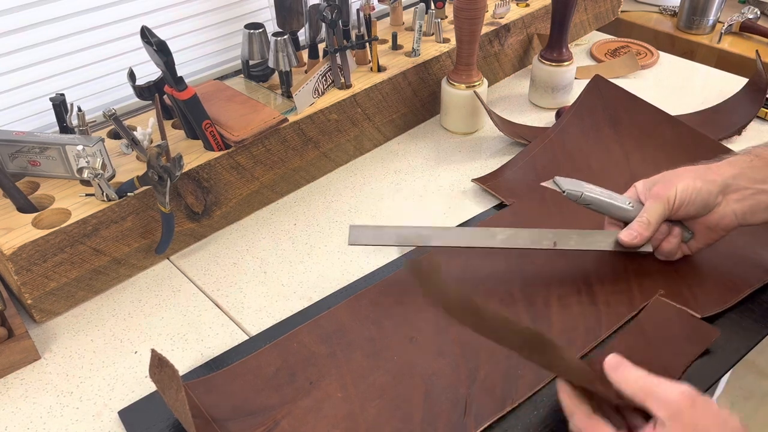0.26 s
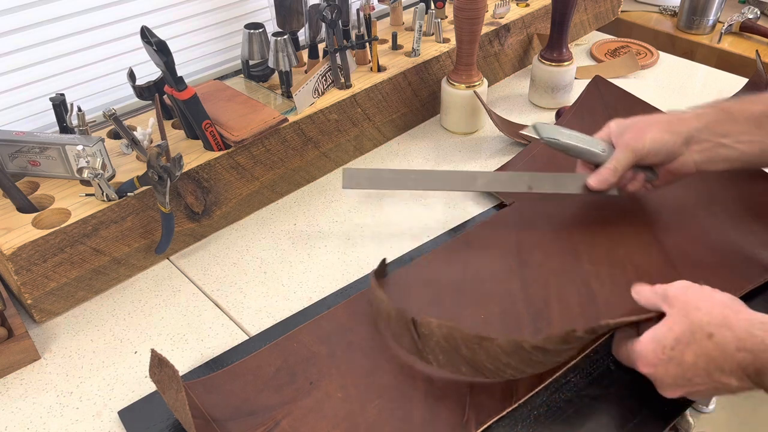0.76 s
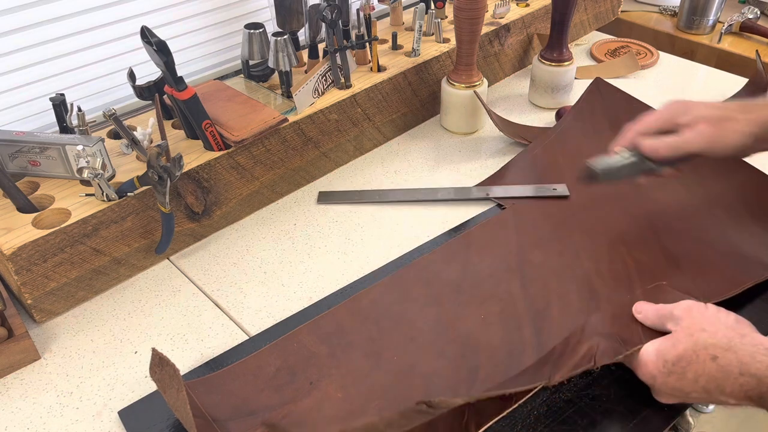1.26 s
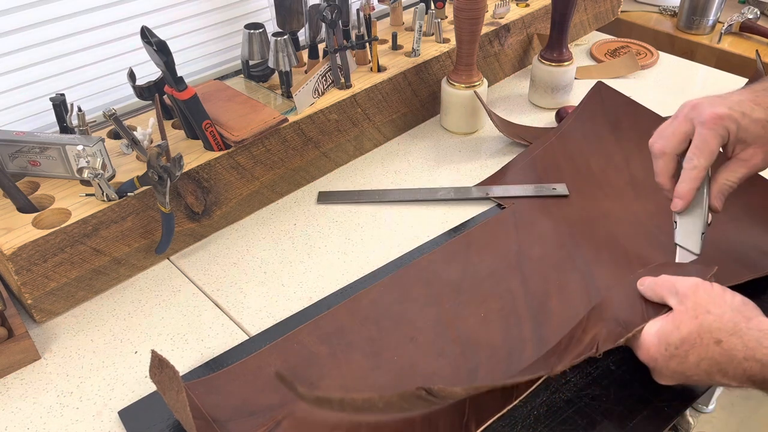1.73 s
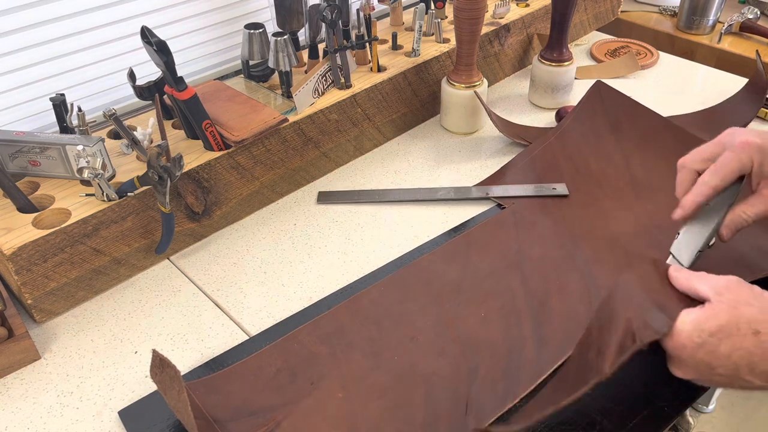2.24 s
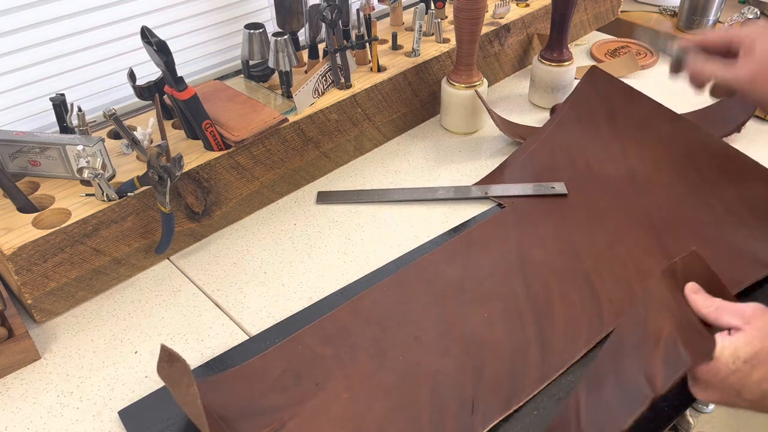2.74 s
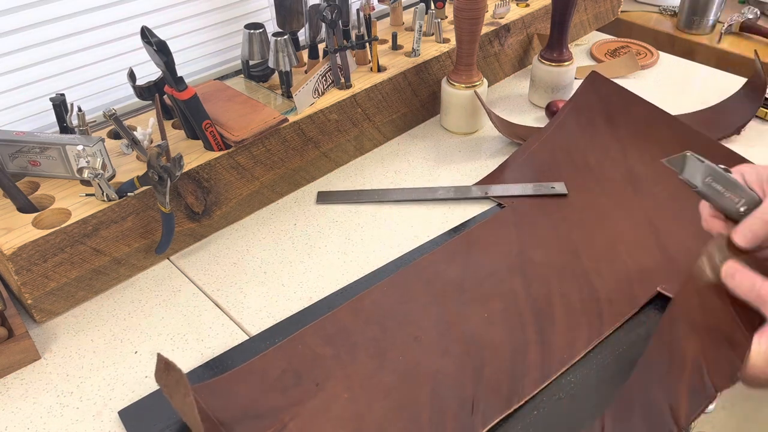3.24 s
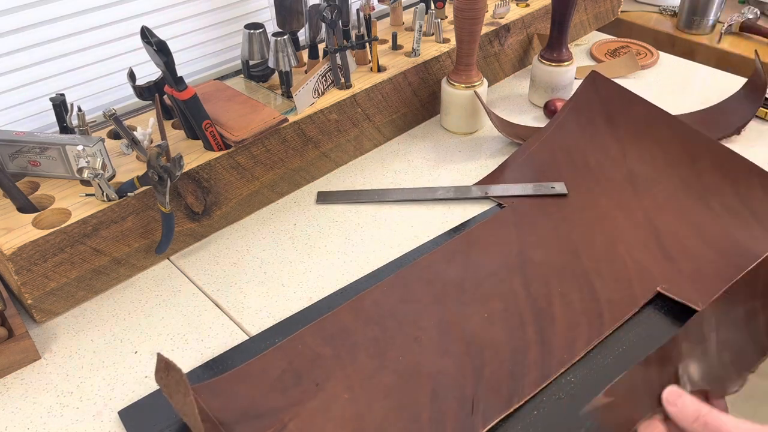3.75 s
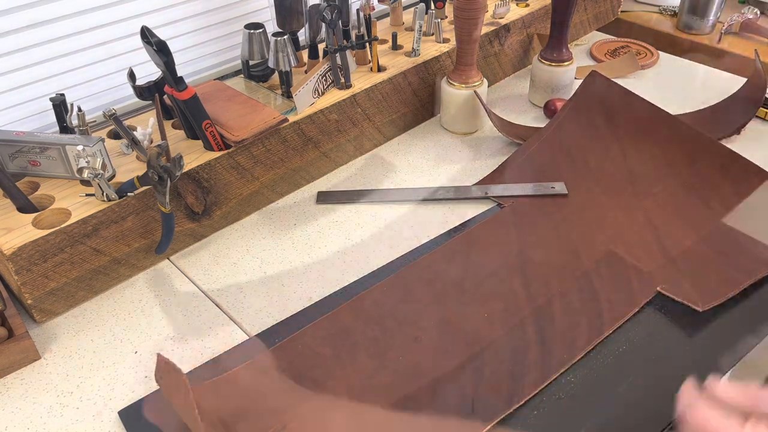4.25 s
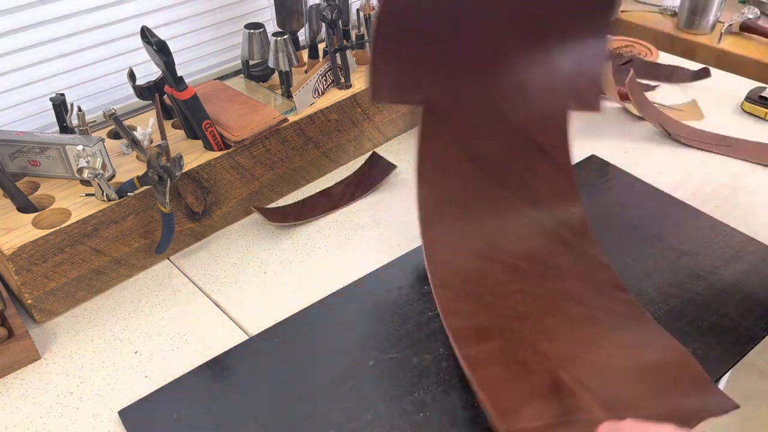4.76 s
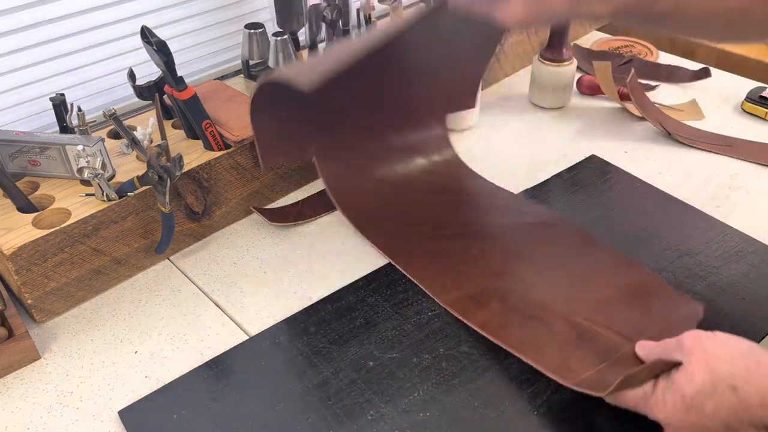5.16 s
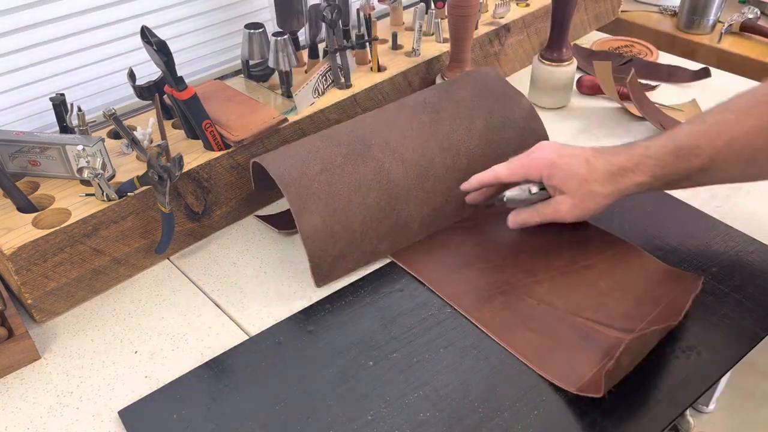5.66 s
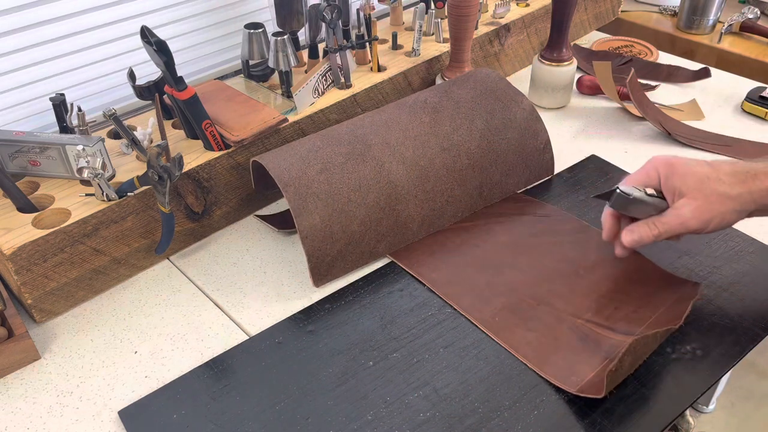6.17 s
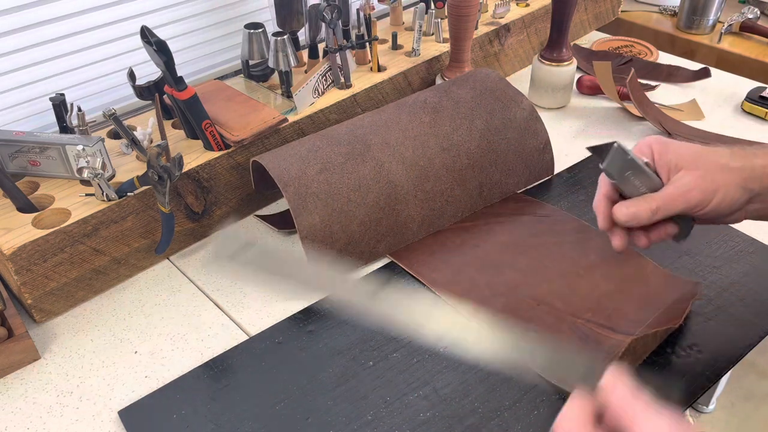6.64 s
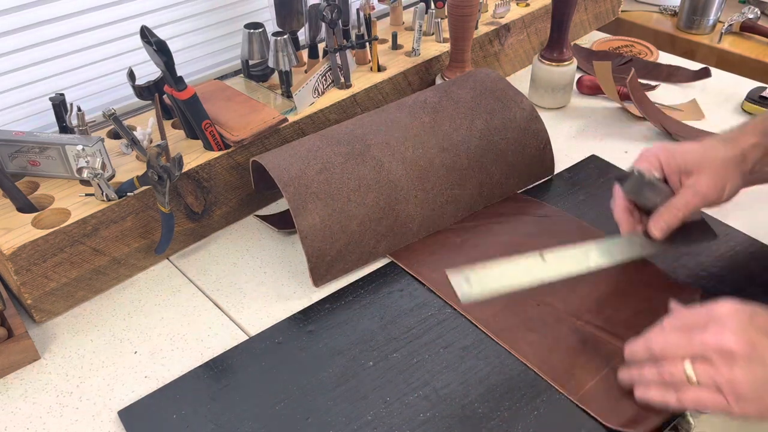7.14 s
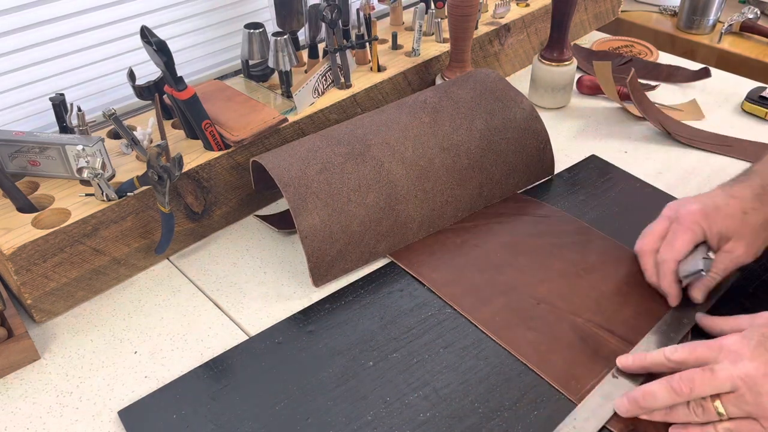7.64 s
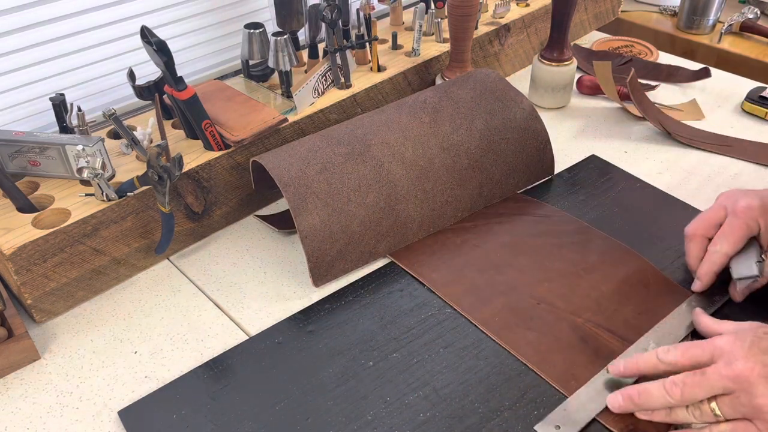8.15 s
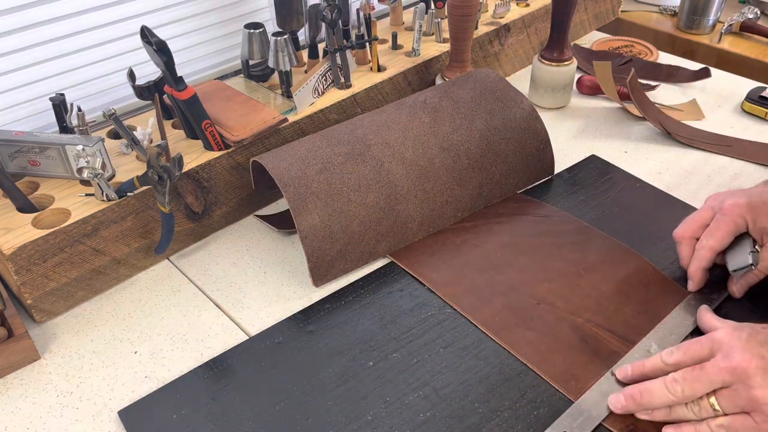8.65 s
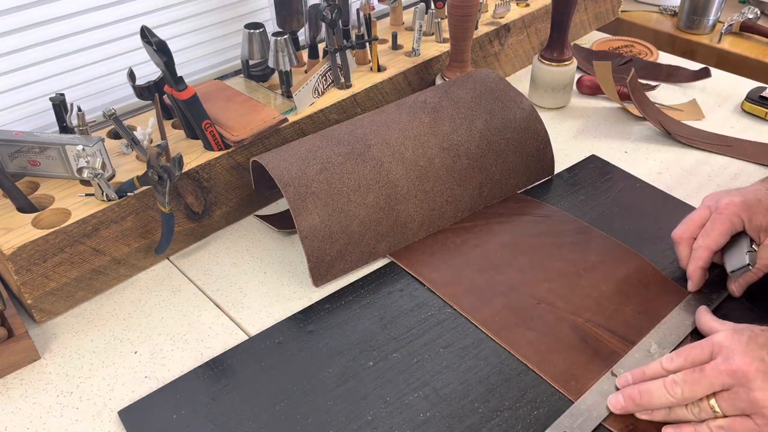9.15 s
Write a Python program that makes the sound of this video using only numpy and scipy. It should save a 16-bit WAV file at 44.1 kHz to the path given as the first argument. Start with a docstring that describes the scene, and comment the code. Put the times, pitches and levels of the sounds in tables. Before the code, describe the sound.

A stiff hide is worked on a wooden bench, heard very close in a small room with faint low room tone. Dull knocks and steel clinks come first, then thin metallic knife rattles and grainy leather friction. The hide is shifted with hollow scuffs and dropped with a sharp, booming slap. Later come smaller rubs, a brisk scrape, a soft thud, and near quiet.

```python
"""Quiet workshop, wooden bench: a stiff hide is handled close to two microphone ports in one small body.
Leather drags and slides as filtered, grainy noise; its slaps are falling air pops with cracks and bench modes.
A steel straightedge is put down and a loose blade rattles in a utility knife's metal handle, as ringing modes.
Low booms lie under the heavier slaps; a dense noise tail lets the room answer each blow over a room tone."""
import sys
import numpy as np
from scipy import signal
from scipy.fft import rfft, irfft, next_fast_len
from scipy.io import wavfile

SR = 44100
rng = np.random.default_rng(int(sys.argv[2]) if len(sys.argv) > 2 else 0)


def amplitude_ratio(level_db):
    """Convert a level in decibels to the matching linear amplitude (field) ratio."""
    exponent = np.asarray(level_db, float) / 20
    return 10 ** exponent


def persist_wave(psi):
    """Save psi, clipped to +-1, as 16-bit WAV."""
    counts = np.round(np.clip(psi, -1, 1) * 32767).astype(np.int16)
    wavfile.write(sys.argv[1], SR, np.atleast_2d(counts).T)


N = 414540


def rms_one(x):
    """Scale to unit rms."""
    return x / np.sqrt(np.mean(x ** 2) + 1e-20)


def at_hz(points, hz):
    """Read a spectrum table on a log-frequency axis."""
    table_hz, value = np.array(points).T
    return np.interp(np.log(hz), np.log(table_hz), value)


def filtered(x, order, hz, kind):
    """Butterworth filter."""
    return signal.sosfilt(signal.butter(order, hz, kind, fs=SR, output="sos"), x)


def drift(corner_hz):
    """Slow chance of spread 1: noise at one value per 40 samples through a double one-pole low-pass."""
    r = np.exp(-80 * np.pi * corner_hz / SR)
    noise = rng.standard_normal(N // 40 + 2002)
    slow = signal.lfilter([1], [1, -2 * r, r * r], noise)[2000:]
    return np.interp(np.arange(N) / 40, np.arange(len(slow)), rms_one(slow))


def panned(x, pan_db):
    """Left-right level difference in dB."""
    return np.array([x * amplitude_ratio(pan_db / 2), x * amplitude_ratio(-pan_db / 2)])


def add(out, s, x):
    """Mix a stereo event in at a time."""
    at = round(s * SR)
    out[:, at:at + x.shape[1]] += x[:, :N - at]


# how alike diffuse sound is at the left and right ports: (frequency [Hz], likeness [1 = identical])
LIKENESS = [(50, 1), (300, 0.39), (1000, 0.035), (3000, 0.5), (6000, 0.055), (14000, 0.7)]
EDGES_HZ = 28 * 2 ** np.arange(0, 9.3, .5)   # half-octave bands


def bands(source, gain, span_hz=(20, 20000)):
    """Half-octave bands of mid and side sources, each with its gain(hz) and left-right likeness."""
    out = 0
    for k, (low, high) in enumerate(zip(EDGES_HZ, EDGES_HZ[1:])):
        hz = np.sqrt(low * high)
        if span_hz[0] < hz < span_hz[1]:
            mid, side = filtered(source[k % 2], 2, [low, high], "band")   # neighbours use different noise
            alike = np.clip(at_hz(LIKENESS, hz), -1, 1)
            out = out + gain(hz) * (np.sqrt(1 + alike) * mid + np.sqrt(1 - alike) * side * [[1], [-1]])
    return out


def struck(modes, tilt_db, spread_db, seconds, chatter_s, free=1, smear=0):
    """One blow: modes of chance strength ring, fed by a chattering contact; peak 1.
    Tilt is in dB per octave; free scales the ringing time; smear splits each mode in five and detunes them."""
    rows = np.repeat(np.array(modes, dtype=float), 5 if smear else 1, axis=0)
    hz, db, t60 = rows.T[:, :, None]
    t = np.arange(round(seconds * SR)) / SR
    strength = amplitude_ratio(db + tilt_db * np.log2(hz / 2000) + spread_db * rng.standard_normal(hz.shape))
    hz = hz * (1 + smear * rng.standard_normal(hz.shape))
    ring = np.sum(strength * amplitude_ratio(-60 * t / (t60 * free)) * np.sin(2 * np.pi * hz * t), axis=0)
    chatter = rng.standard_normal(len(t)) * amplitude_ratio(-60 * t / chatter_s)
    x = signal.fftconvolve(ring, chatter)[:len(t)]
    return x / np.abs(x).max()


def crack(size, low_hz, high_hz, t60, rise_s=0.00013):
    """The contact itself: a dying burst of band noise, peak 1."""
    t = np.arange(size) / SR
    burst = rng.standard_normal(size) * amplitude_ratio(-60 * t / t60) * (1 - np.exp(-t / rise_s))
    x = filtered(burst, 3, [low_hz, high_hz], "band")
    return x / np.abs(x).max()


def friction(spectrum, per_s, spread_db, grain_share, patchy_db):
    """Fibres catch and let go: random grains over smooth noise, in patches that come and go."""
    grains = (rng.random(N) < per_s / SR) * amplitude_ratio(spread_db * np.minimum(rng.exponential(1, N), 4))
    source = rng.standard_normal((2, 2, N)) * (1 + grain_share * rms_one(grains))
    together = drift(25.0)   # patches common to all bands

    def gain(hz):
        return amplitude_ratio(at_hz(spectrum, hz) + patchy_db * (together + 1.4 * drift(12)))
    return rms_one(bands(source, gain, (spectrum[0][0], spectrum[-1][0])))


def hollow(x, hz, width_hz):
    """The air under the lifted hide resonates at a pitch that moves with its shape."""
    out, state, r = np.zeros_like(x), np.zeros((2, 2)), np.exp(-np.pi * width_hz / SR)
    for i in range(0, N, 512):
        poles = [1, -2 * r * np.cos(2 * np.pi * hz[i] / SR), r * r]
        out[:, i:i + 512], state = signal.lfilter([1 - r, 0, r - 1], poles, x[:, i:i + 512], zi=state)
    return out


LINGER_S = 0.017   # the hide settles after the hand has stopped


def gestures(rows, sharpness):
    """One sine-shaped swell and fade per movement, raised to a power, with its other columns."""
    t = np.arange(0, N + 64, 64) / SR
    start, swell, fade, *columns = np.transpose(rows)[:, :, None]
    phase = np.clip((t - start) / swell, 0, 1) * np.clip((start + swell + fade - t) / fade, 0, 1)
    linger = np.exp(-64 / SR / LINGER_S)
    hand = np.sin(np.pi / 2 * phase) ** sharpness + 1e-18
    return np.maximum(hand, signal.lfilter([1 - linger], [1, -linger], hand)), *columns


def every_sample(coarse):
    """Fill in a control that has one value per 64 samples."""
    return np.interp(np.arange(N) / 64, np.arange(len(coarse)), coarse)


# the quiet workshop with nobody moving: (frequency [Hz], relative level [dB per Hz])
ROOM_TONE = [(15, -56), (25, -33.0), (45, -7.0), (66, -0.5), (98, -13.0), (173, -9.0), (199, -11.5),
             (246, -13), (264, -22.0), (359, -22.5), (632, -35.0), (7000, -44.0), (9100, -82),
             (15400, -120), (15500, -62)]
ROOM_TONE_DB = -68   # rms


def room_tone():
    """Steady noise in half-octave bands, each wavering slowly in level."""
    noise = rng.standard_normal((2, 2, N))
    tone = bands(noise, lambda hz: amplitude_ratio(at_hz(ROOM_TONE, hz) + 2.0 * drift(12.0)))
    return amplitude_ratio(ROOM_TONE_DB) * rms_one(tone)


# leather or skin sliding over a smooth surface, close to the ports: (start [s], swell [s], fade [s],
# relative hiss level [dB], relative fizz level [dB], bright pitch [Hz])
SLIDES = [(.07, 0.0064, 0.075, -65, -76, 2060), (.17, 0.26, 0.22, -63, -70, 2480),
          (.74, 0.0085, 0.15, -91, -80, 2500), (.9, 0.082, 0.18, -60.5, -81, 2500),
          (1.05, 0.11, 0.21, -60.5, -85, 2500), (1.36, 0.24, 0.38, -68.5, -80.5, 3500),
          (1.99, 0.035, 0.061, -79, -89.5, 2500), (2.04, .015, 0.046, -62, -78.5, 1960),
          (2.18, .018, 0.038, -71, -88, 2000), (2.238, 0.013, 0.047, -73.5, -83.5, 2200),
          (2.33, 0.012, 0.032, -69, -74, 1990), (2.51, .04, 0.051, -79, -81.5, 3800),
          (2.57, 0.087, 0.075, -63, -83.5, 2500), (2.77, 0.05, 0.43, -64, -81.5, 3960),
          (3.14, 0.23, 0.15, -57, -67, 2210), (3.36, .26, 0.26, -56, -65.5, 6040),
          (3.91, 0.0073, 0.24, -60, -86, 3450), (4.02, 0.17, 0.22, -81, -85.5, 2000),
          (4.4, 0.063, 0.054, -67, -76.5, 3180), (4.53, 0.046, 0.114, -60, -77, 1820),
          (4.63, 0.044, .05, -67, -79, 3700), (4.68, 0.087, 0.071, -60, -75.5, 2190),
          (4.79, 0.073, 0.56, -67.5, -80, 2600), (5.14, 0.022, .06, -64, -70.5, 3800),
          (5.17, 0.037, 0.062, -55, -71, 2550), (5.25, 0.038, 0.16, -68, -73.5, 2500),
          (5.37, 0.051, 0.067, -69, -79.5, 1750), (5.5, 0.034, 0.15, -85, -90.5, 2500),
          (5.9, 0.176, 0.103, -57.5, -68, 4100), (6.19, 0.11, 0.047, -62.5, -72.5, 3690),
          (6.36, 0.078, 0.14, -77, -97, 4120), (6.69, 0.072, 0.077, -69, -76, 5550),
          (6.82, 0.22, 0.15, -74.5, -84, 3000), (7.12, 0.066, 0.12, -49.5, -69, 3260),
          (7.19, 0.093, 0.11, -49, -79.5, 4590), (7.33, 0.088, 0.091, -66.5, -91, 2500),
          (7.45, 0.15, 0.25, -70, -75.5, 2500), (7.9, 0.066, 0.077, -101, -92.5, 2980),
          (8.08, .05, 0.11, -97, -96, 2500), (8.31, 0.048, 0.08, -82, -101, 5500)]
# surface hiss: (frequency [Hz], relative level [dB per Hz])
HISS = [(500, -23.5), (900, -4), (1500, 2), (3000, -4), (5000, -5.5), (7000, -5), (9000, -15), (12000, -35)]
# fine fizz: (frequency [Hz], relative level [dB per Hz])
FIZZ = [(3000, -30), (6000, -8.5), (9000, 1), (12000, 3.5), (15000, -8), (18000, -20)]
# hands resting on the hide never fall quite still
REST_HISS_DB, REST_FIZZ_DB, REST_BRIGHT_HZ = -89, -91, 2500
BRIGHT_WIDTH_HZ, BRIGHT_DB = 1100, -0.5


def slides():
    """Each slide hisses and fizzes under one envelope; the hiss leans to the level-weighted bright pitch."""
    shape, hiss_db, fizz_db, hz = gestures(SLIDES, sharpness=2)
    gain, rest = shape * amplitude_ratio(hiss_db), amplitude_ratio(REST_HISS_DB)
    level = gain.sum(axis=0) + rest
    bright_hz = every_sample(((gain * hz).sum(axis=0) + rest * REST_BRIGHT_HZ) / level)
    fizz_level = every_sample((shape * amplitude_ratio(fizz_db + 6.0)).sum(axis=0) + amplitude_ratio(REST_FIZZ_DB))
    hiss = friction(HISS, per_s=840.0, spread_db=8.0, grain_share=0.2, patchy_db=.9)
    hiss = 0.69 * hiss + amplitude_ratio(BRIGHT_DB) * hollow(hiss, bright_hz, BRIGHT_WIDTH_HZ)
    fizz = friction(FIZZ, per_s=900.0, spread_db=8.5, grain_share=.2, patchy_db=.9)
    return every_sample(level) * hiss + fizz_level * fizz


# the stiff hide shifts its weight on the bench: (start [s], swell [s], fade [s],
# relative drag level [dB], pitch of the hollow under it [Hz])
DRAGS = [(.17, 0.36, 0.19, -64, 377), (.7, 0.0304, 0.084, -53.5, 422), (.88, 0.016, 0.57, -50.5, 475),
         (1.42, 0.18, 0.24, -60.5, 464), (1.98, 0.093, 0.074, -64.5, 590), (2.15, 0.077, 0.13, -71, 374),
         (2.53, 0.11, 0.038, -49.5, 600), (2.64, 0.029, 0.12, -61.5, 582), (2.8, 0.038, 0.24, -69.5, 499),
         (3.1, 0.12, 0.4, -62.5, 370), (3.88, 0.077, 0.21, -61, 368), (4.05, 0.15, 0.23, -65, 400),
         (4.22, 0.12, 0.082, -55.5, 520), (4.53, 0.046, 0.12, -45, 516), (4.66, 0.043, 0.13, -43.5, 505),
         (4.78, 0.068, 0.2, -50.5, 471), (4.98, 0.19, 0.092, -54, 428), (5.13, 0.032, 0.084, -52, 340),
         (5.18, 0.044, 0.19, -49.5, 420), (5.36, .08, .08, -56.5, 419), (5.45, 0.096, 0.45, -52.5, 384),
         (5.9, 0.11, 0.24, -52, 480), (6.25, 0.045, 0.12, -65, 420), (6.68, 0.064, 0.078, -75.5, 290),
         (7.08, 0.09, 0.12, -56.5, 491), (7.35, 0.22, 0.12, -59.5, 400.9), (7.6, .03, .25, -53.5, 523.8),
         (7.85, 0.05, 0.084, -69.5, 413), (8.11, 0.029, 0.047, -64.5, 423),
         (8.33, 0.047, 0.07, -69.5, 447.5)]
# dull friction of the hide: (frequency [Hz], relative level [dB per Hz])
DRAG = [(47, -37.5), (80, -13), (288, -6), (459, -6.5), (684, -15), (841, -6), (1170, -21.5), (1410, -19.5),
        (2730, -32.5), (5000, -44), (6500, -71.5), (11000, -120)]
REST_DRAG_DB, REST_HOLLOW_HZ = -76.5, 338.5   # hands at rest
HOLLOW_WANDER = 0.097   # octaves


def drags():
    """Dull friction, coloured by a hollow whose pitch leans to the loudest movement."""
    shape, db, hz = gestures(DRAGS, sharpness=0.98)
    gain, rest = shape * amplitude_ratio(db), amplitude_ratio(REST_DRAG_DB)
    level = gain.sum(axis=0) + rest
    mean_hz = every_sample(((gain * hz).sum(axis=0) + rest * REST_HOLLOW_HZ) / level)
    hollow_hz = mean_hz * 2 ** (HOLLOW_WANDER * drift(6.1))
    drag = friction(DRAG, per_s=400.0, spread_db=3.5, grain_share=0.25, patchy_db=2.2)
    overtones = [(1, 11, 70), (1.95, 7.1, 80), (2.9, 8.1, 100)]   # (multiple, level [dB], width [Hz])
    hum = sum(amplitude_ratio(tone_db) * hollow(drag, multiple * hollow_hz, width_hz)
              for multiple, tone_db, width_hz in overtones)
    return every_sample(level) * (0.6 * drag + 0.42 * rms_one(hum))


# leather, hand or tool landing on the bench; the faint high rows are small ticks: (time [s], level [dB],
# pitch of the pop [Hz], crack hardness [dB against the pop], pop length [s])
SLAPS = [(0.083, -55, 920, -4, 0.028), (0.487, -43, 370, 6, 0.03), (0.709, -37, 386, -14.5, 0.022),
         (0.764, -43, 676, -7.5, 0.024), (0.896, -29.5, 459, -16.5, 0.041),
         (0.948, -38.5, 431, -2.5, 0.042), (1.039, -39.5, 450, 1, 0.032), (1.052, -26, 434, -7, 0.035),
         (1.073, -31, 815, -15.5, 0.028), (1.126, -43, 523, -19, 0.029), (1.136, -34, 466, -6, 0.028),
         (1.165, -37, 890, -7.5, 0.022), (1.193, -36, 514, -7, 0.042), (1.66, -54, 1053, 0, 0.065),
         (2.193, -62, 643, -2, 0.034), (2.343, -66, 1110, 4, .04), (2.554, -48.5, 603, -8, 0.034),
         (2.582, -34, 587, -7, 0.035), (2.64, -34, 807, -6, .015), (2.653, -43, 846, -4.5, 0.038),
         (2.66, -42, 944, -11.5, .02), (2.849, -53, 697, 8.5, 0.052), (3.92, -48.5, 1177, 15, 0.047),
         (4.546, -44, 614, -20, 0.043), (4.571, -33.5, 505, -15, .022), (4.583, -30, 559, -15, 0.03),
         (4.602, -44.5, 1290, -10, 0.018), (4.69, -38.5, 514, -28, 0.022), (4.701, -34.5, 492, -30, 0.053),
         (4.946, -60, 3340, -6.5, .012), (5, -60, 2670, -17, .015), (5.056, -58, 2010, -7.5, 0.018),
         (5.118, -39.5, 1010, -14, 0.017), (5.157, -42, 305.4, -8.5, 0.032),
         (5.252, -53.5, 2400, -3.5, 0.018), (5.34, -54.5, 449.3, 3, 0.017),
         (5.494, -47.5, 555, -15.5, 0.071), (5.522, -0.5, 405, -54.5, 0.017),
         (5.957, -41.5, 736, -11, 0.026), (7.166, -45, 517, -9, 0.024), (7.486, -46, 378, -14.5, 0.03),
         (7.609, -33.5, 568, -8, .03), (7.616, -28.5, 397, -19.5, 0.034), (8.137, -56, 406, -33, 0.043)]
# modes of the wooden bench top: (frequency [Hz], relative level [dB], t60 [s])
BENCH = [(112, -18.5, 0.2), (124, -14, 0.15), (168, -2, 0.04), (226.6, -1, 0.14), (300.2, -11.5, 0.14),
         (347, 2, 0.55), (394, -6, 0.45), (455, -4.5, 0.4), (600, -13.5, 0.059), (714, -15, 0.12),
         (900, -17, .12), (1050, -15, 0.099)]
BENCH_DB = -9   # bench against the pop
BENCH_TILT_DB, TILT_PER_DB = 3, 0.5   # dB per octave for a full-scale blow; softer blows are duller
# a brief snap: width, lag, strength at full scale; softer blows snap less
SNAP_S, SNAP_LAG_S, SNAP_DB, SNAP_PER_DB = .00011, .0011, -7, 3.5
SLAP_LOW_HZ = 110   # a slap moves too little air for deep bass
SLAP_PAN_DB = -1.95


def slaps():
    """Air squeezed out from under the leather pops for a few cycles, falling in pitch; the bench top rings on.
    The harder the contact, the rougher the pop and the brighter its crack."""
    out, t = np.zeros((2, N)), np.arange(round(.5 * SR)) / SR
    for s, db, hz, crack_db, t60 in SLAPS:
        lead = (t - SNAP_LAG_S) / SNAP_S
        snap = amplitude_ratio(SNAP_DB + SNAP_PER_DB * db) * lead * np.exp(-lead ** 2 / 2)
        swell = (1 - np.exp(-(t / 0.00098) ** 2)) * np.exp(-np.log(1000) * (t / t60) ** 2)
        pop = swell * np.sin(2 * np.pi * hz * (t + .0016 * (1 - np.exp(-t / 0.00065))))
        tilt_db = BENCH_TILT_DB + TILT_PER_DB * db
        bench = amplitude_ratio(BENCH_DB) * struck(BENCH, tilt_db, spread_db=2.5, seconds=.5, chatter_s=0.0006)
        rough = amplitude_ratio(0.68 * crack_db + 6.0) * crack(len(t), 180, 1500, t60 * 1.6, rise_s=0.0013)
        edge_hz = np.clip(7000 * 2 ** (crack_db / 22), 2600, 8000)
        edge = amplitude_ratio(crack_db) * crack(len(t), 1200, edge_hz, t60 * 2.4, rise_s=0.00055)
        add(out, s, panned(amplitude_ratio(db) * (snap + pop + bench + rough + edge), SLAP_PAN_DB))
    return filtered(out + 1e-18, 2, SLAP_LOW_HZ, "high")


# how long the workshop rings: (frequency [Hz], t60 [s])
ROOM_T60 = [(80, 0.94), (350, 0.61), (1000, 0.37), (3000, 0.51), (8000, 0.065), (14000, .2)]
# colour of the workshop's answer: (frequency [Hz], relative level [dB])
ROOM_COLOUR = [(80, -15.5), (350, -14), (650, -16.5), (1100, -9.5), (2000, -15.5), (5000, -7.5),
               (8000, -14.5), (14000, -19)]


def room(x):
    """A dense noise tail starts 6 ms after each blow and dies soonest around 8 kHz."""
    t = np.arange(round(.9 * SR)) / SR
    onset = np.clip((t - .006) / 0.0013, 0, 1)

    def decay(hz):
        return amplitude_ratio(at_hz(ROOM_COLOUR, hz) - 60 * t / at_hz(ROOM_T60, hz)) * onset
    tail = bands(rng.standard_normal((2, 2, len(t))), decay) / 30
    return signal.fftconvolve(x.mean(axis=0)[None], tail, axes=1)[:, :N]


# straightedge touching down on the bench: (time [s], level [dB], ring [dB against the tick],
# freedom to ring [multiple of t60])
CLINKS = [(0.8946, -22, -0.5, 0.47), (0.9145, -36, -1, 0.95), (1.0368, -34.5, 0.5, .5),
          (1.054, -37.5, 0.5, 0.76), (1.075, -38, 5, .7), (1.1254, -26.5, 1.5, 0.83),
          (1.139, -28.5, 3, 1.4), (1.151, -33, 1.5, 1.1), (1.1709, -35, 4, 0.88), (1.1992, -33.5, 1, 1.2),
          (1.2142, -38, 1, 1.2), (1.239, -44, 2.5, 1.1)]
# modes of the steel bar: (frequency [Hz], relative level [dB], t60 at freedom 1 [s])
STRAIGHTEDGE = [(850, 1, 0.049), (910, 0, 0.055), (1033, 4, 0.067), (1262, -5.5, 0.073), (1432, -6, 0.12),
                (1720, -6.5, 0.084), (2010, 0.5, 0.1), (2220, -9, 0.09), (2665, -5, 0.17), (2955, -8, 0.1),
                (3424, -9, 0.17), (3714, -16, .12), (4276, -3, 0.18), (4592, -10, .12), (5216, -3.5, 0.16),
                (5633, -9, .12), (6245, -3, 0.12), (7391, 0, 0.15), (8600, 5, 0.15), (9940, -3, 0.085),
                (10630, -14, .08), (11860, -10, 0.095), (12870, -16, .07)]
CLINK_PAN_DB = -2.5


def clinks():
    """Steel bar: thin lines behind a bright tick."""
    out = np.zeros((2, N))
    for s, db, ring_db, free in CLINKS:
        ring = struck(STRAIGHTEDGE, 0, spread_db=3, seconds=.3, chatter_s=.04, free=max(free, .3), smear=.003)
        tick = crack(len(ring), 880, 16000, 0.057)
        add(out, s, panned(amplitude_ratio(db) * (amplitude_ratio(ring_db) * ring + tick), CLINK_PAN_DB))
    return out


# blade rattling in the hand-held handle: (time [s], level [dB], treble balance [dB],
# looseness of the grip [multiple of t60], pitch the contact favours [Hz])
RATTLES = [(1.331, -23.5, -5.5, .9, 7100), (1.3397, -27.5, -3.5, 2.5, 5000), (1.3638, -30, -6.5, 2.2, 5370),
           (1.64, -44.5, -5.5, 1.6, 3780), (1.662, -39, -4, 0.95, 6400), (1.7421, -36.5, 0.5, 1.5, 7300),
           (1.796, -56, -15, 1.5, 2030), (1.8036, -47.5, -4, 0.9, 5800), (1.8185, -42, -2, 0.99, 5840),
           (1.838, -45, 0, 1.4, 5800), (1.8902, -43.5, -3.5, 1.1, 5920), (1.995, -58.5, -7.5, .5, 3320),
           (2.05, -50.5, 0, .4, 4460), (2.061, -41, -5.5, .5, 3880), (2.522, -63.5, -11, 1, 3850),
           (2.5835, -32.5, -19, 0.98, 3800), (2.6153, -43.5, -8, 1.2, 3580), (2.629, -32.5, -5, 1.7, 6300),
           (2.6539, -29, -14.5, 0.42, 3320), (2.7, -50, -4, 1, 5810), (2.7948, -40.5, -14.5, 3.9, 3870),
           (2.818, -29, -1.5, 1.2, 7400), (2.8442, -35, 9, 2.1, 6300), (2.8596, -32, -7, 0.54, 5710),
           (2.9034, -40.5, -13, 2.3, 3870), (2.917, -40.5, 4, 2.7, 6340), (2.94, -44, -0.5, 1.6, 5360),
           (2.9692, -32.5, 2, 1.2, 7200), (3.0285, -43, -8, 1.7, 6300), (3.1697, -28.5, -1.5, 0.81, 4800),
           (3.1988, -38.5, -5, 0.85, 5030), (3.338, -52, -17.5, 1.2, 2000), (3.485, -50, -24, 1.1, 2010),
           (3.752, -62, -25, 1.1, 2020), (3.838, -65, 3, 0.87, 5750), (3.857, -58, 1, 1.4, 3880),
           (3.8717, -53.5, 0, 3.7, 5750), (5.891, -60.5, 2.5, 3.7, 6290), (6.0573, -47.5, 1.4, 3.2, 6210),
           (6.6554, -60, -35.5, 1.35, 2007), (6.6871, -53, -13, 0.86, 3870), (6.738, -48.5, -19, 1.2, 3850),
           (6.774, -67, -17.5, 1.17, 2005), (6.8488, -44.5, -9, 1.03, 6840), (6.8843, -37, -11, 1.07, 4780),
           (6.956, -55.5, -25, 1.2, 1970), (6.986, -42.5, -17, 0.89, 3830),
           (7.0932, -50, -11.5, 0.97, 7300), (7.1128, -45, -24, 0.96, 3870)]
# modes of the hollow metal handle: (frequency [Hz], relative level [dB], t60 at looseness 1 [s])
HANDLE = [(1947, -4, 0.11), (2008, 4.5, 0.15), (2086, -0.5, 0.15), (2223, -4.5, 0.07), (3570, -1.5, 0.028),
          (3870, -0.5, 0.039), (4356, -7.5, 0.03), (4736, 1, 0.05), (5050, -8.5, .025), (5370, 1.5, .085),
          (5800, 3, 0.025), (6300, 3.5, 0.025), (7100, 2, .015), (7340, 6, 0.012), (9800, -12, 0.01),
          (11000, -10, 0.017)]
# lift and longer ring of the handle's modes near the favoured pitch
FAVOUR_DB, FAVOUR_RING, FAVOUR_OCTAVES = 8.5, 0.42, 0.1
RATTLE_PAN_DB, HANDLE_LOW_HZ = 2, 1532   # the small handle radiates little bass


def rattles():
    """A tight grip damps the hollow handle; harder, thinner contacts favour its upper modes."""
    out = np.zeros((2, N))
    hz, level_db, t60 = np.transpose(HANDLE)
    for s, db, treble_db, free, favoured_hz in RATTLES:
        near = np.exp(-(np.log2(hz / favoured_hz) / FAVOUR_OCTAVES) ** 2)
        modes = np.transpose([hz, level_db + FAVOUR_DB * near, t60 * (1 + FAVOUR_RING * near)])
        ring = struck(modes, treble_db * .6, spread_db=3, seconds=.3, chatter_s=.018,
                      free=max(free, .3), smear=.02)
        ring = amplitude_ratio(db + max(treble_db, 0)) * 1.234 * filtered(ring, 3, HANDLE_LOW_HZ, "high")
        tick = amplitude_ratio(db + treble_db + 1.5) * crack(len(ring), 3200, 20000, 0.04, rise_s=.0008)
        add(out, s, panned(ring + tick, RATTLE_PAN_DB))
    return out


# low boom under the heavier slaps: (time [s], level [dB], frequency [Hz], t60 [s])
BOOMS = [(2.587, -41.5, 105, 0.25), (2.64, -48.5, 110, 0.19), (2.85, -46, 113.6, 0.37),
         (3.923, -43, 107, 0.49), (5.219, -43.5, 103.4, .25), (5.521, -25, 215, 0.1),
         (7.612, -32.5, 141.6, .12)]
BOOM_RISE_S = 0.0085


def booms():
    """A low boom under the heavier slaps: five detuned low modes with a slow rise."""
    out, t = np.zeros((2, N)), np.arange(round(.4 * SR)) / SR
    for s, db, hz, t60 in BOOMS:
        boom = struck([(hz, 0, t60)], 0, spread_db=0, seconds=.4, chatter_s=.03, smear=.12)
        add(out, s, panned(amplitude_ratio(db) * boom * (1 - np.exp(-t / BOOM_RISE_S)), 0))
    return out


LEATHER_PAN_DB = -0.46
# a slap's treble stays near the bench; hand-held metal reaches the walls freely
SLAP_ROOM_HZ, METAL_ROOM_DB = 1503, 1


def scene():
    """Blows with their room, the moving leather, and the room tone."""
    leather = (drags() + slides()) * amplitude_ratio(np.array([[LEATHER_PAN_DB / 2], [-LEATHER_PAN_DB / 2]]))
    wood, metal = slaps() + booms(), clinks() + rattles()
    dull = filtered(wood, 1, SLAP_ROOM_HZ, "low")
    return wood + metal + room(dull + amplitude_ratio(METAL_ROOM_DB) * metal) + leather + room_tone()


def band_limit(x):
    """A steep low-pass at the top of the band."""
    return signal.sosfilt(signal.butter(12, 16010, fs=SR, output="sos"), x)


# level balance of the two microphone ports: (frequency [Hz], left-right level [dB])
PORT_BALANCE = [(300, 0.5), (1500, -1), (3000, 5), (4500, 6.5), (6000, 2), (7000, 2.5)]
# treble above MERGE_HZ is shared, and reaches the left port late above LAG_FROM_HZ
MERGE_HZ, LAG_FROM_HZ, LAG_S = 6800, 5250, 1.515e-4
TOP_HZ = 15550   # nothing is heard above about 15.5 kHz


def record(dry):
    """Two close ports in one small body: merged treble, a lag between them, a tilt in balance."""
    size = next_fast_len(N + 512)
    hz = np.maximum(np.arange(size // 2 + 1) * SR / size, 1)
    left, right = rfft(dry, size) / (1 + (hz / TOP_HZ) ** 24)
    mid = (left + right) / 2
    side = (left - right) / 2 / (1 + (hz / MERGE_HZ) ** 12)
    # half the balance and half the lag on each port, in opposite senses
    half_lag = np.exp(-1j * np.pi * np.maximum(hz - LAG_FROM_HZ, 0) * LAG_S)
    port = amplitude_ratio(at_hz(PORT_BALANCE, hz) / 2) * half_lag
    ports = irfft([(mid + side) * port, (mid - side) / port], size)[:, :N]
    return band_limit(ports)


dry = scene()
out = record(dry)
persist_wave(out)
```